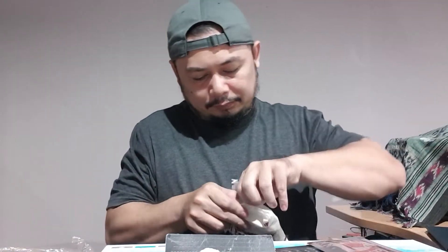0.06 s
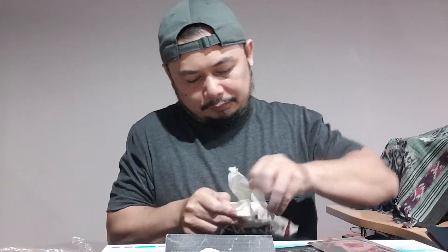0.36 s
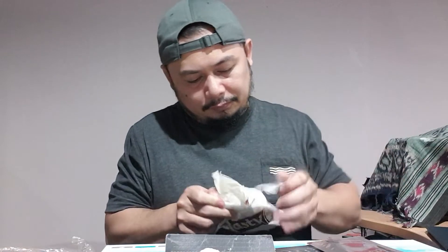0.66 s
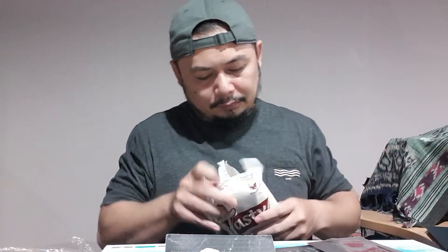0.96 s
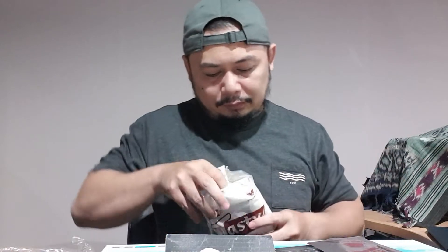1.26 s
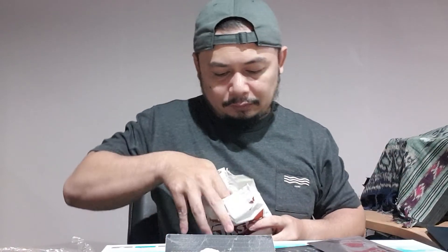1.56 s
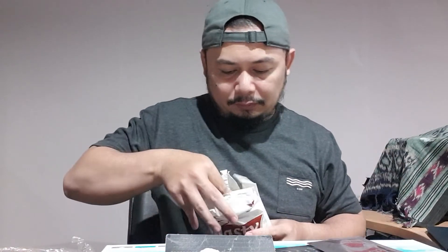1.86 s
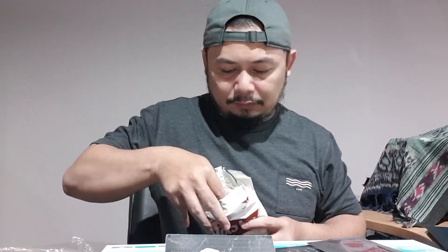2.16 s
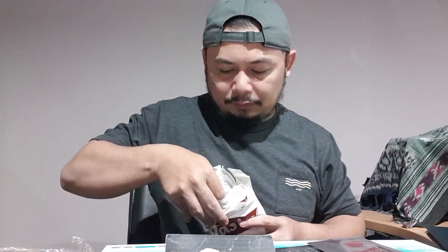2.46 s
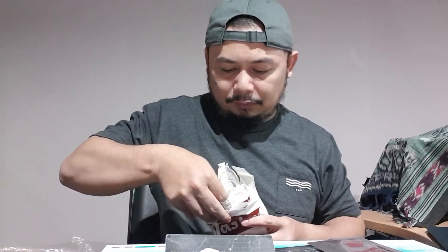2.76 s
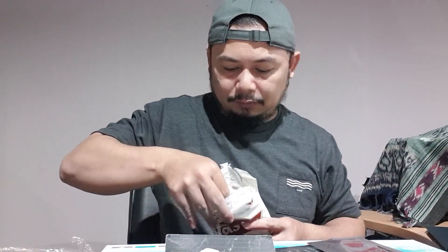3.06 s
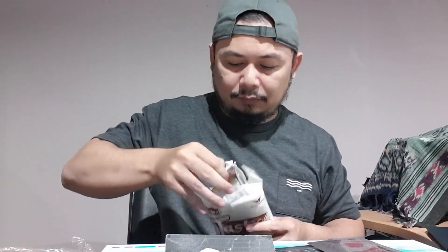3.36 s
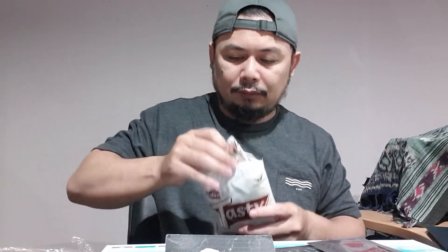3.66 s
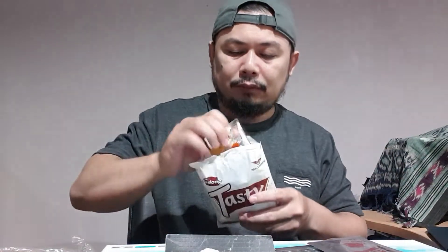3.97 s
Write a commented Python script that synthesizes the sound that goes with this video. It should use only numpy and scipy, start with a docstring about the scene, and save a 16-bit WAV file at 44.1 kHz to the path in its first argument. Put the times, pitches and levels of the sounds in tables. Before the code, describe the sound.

Hands knead a plastic noodle packet, making it crackle, snap and rustle.

```python
"""A fine crackle and rustle of plastic: two hands squeeze and knead a noodle packet at a table.
Creases in the film buckle in sharp snaps over the swarm of tiny crackles, the dry noodles crunch dully
inside, and now and then a whole wall of the packet flips with a hollow pop. The film sounds in three
bands: low body, middle crack and high sizzle. The small room adds a short tail, a rumble and a low hum."""
import sys
import numpy as np
from scipy import signal
from scipy.fft import rfft, irfft
from scipy.io import wavfile
from scipy.ndimage import uniform_filter1d

SR = 44100
rng = np.random.default_rng(int(sys.argv[2]) if len(sys.argv) > 2 else 0)


def generate_wav(signal):
    """Clip the signal to [-1, 1] and save it as 16-bit WAV at the path in sys.argv[1]."""
    frames = np.transpose(np.atleast_2d(signal))
    scaled = np.clip(frames, -1, 1) * 32767
    pcm = np.round(scaled).astype(np.int16)
    wavfile.write(sys.argv[1], SR, pcm)


N = 176400

# Tone colour of the packet: frequency_hz, gain_db
PACKET_EQ = [(60, -2), (170, -10), (280, -2), (380, -2.5), (495, 5), (620, -2.5), (740, 1), (1020, -2.5),
             (1600, 2), (2300, 2.5), (3100, 4), (4300, 3), (5200, -1.5), (6500, -8.5), (8600, -21),
             (10800, -9), (12500, -10), (15000, -9.5), (17000, -14.5)]
# Stereo image: frequency_hz, correlation, left_minus_right_db
STEREO_IMAGE = [(200, 0.96, -1.5), (600, 0.87, -2.5), (1200, 0.65, -5), (2200, 0.039, 0), (4000, 0.2, -2.5),
                (6000, 0, -1.5), (9000, 0, 2.5), (15100, 0, 5)]
# Fader ride for crackle and rustle as the fingers press and let go: time_s, body_db, crack_db, sizzle_db
FINGER_PRESSURE = [(0.0, -45, -40, -42.5), (0.192, -43.5, -34.5, -53), (0.216, -26, -23, -27),
                   (0.36, -42.5, -41, -51.5), (0.415, -33, -29, -36.5), (0.454, -38.5, -42.5, -52),
                   (0.506, -34.5, -26.5, -26), (0.544, -41, -37, -47), (0.564, -37, -29.5, -37),
                   (0.675, -45, -46, -53.5), (0.743, -32, -30.5, -36), (0.802, -49, -46, -55),
                   (0.848, -39.5, -41.5, -51), (0.893, -51, -44, -61), (0.978, -33.5, -32, -39.5),
                   (1.043, -40, -37.5, -43), (1.072, -32.5, -28, -38), (1.126, -44, -41.5, -50),
                   (1.314, -35.5, -33.5, -42), (1.337, -46, -41.5, -49), (1.367, -35, -37.5, -48),
                   (1.467, -43, -39, -44.5), (1.566, -32, -32.5, -40.5), (1.721, -54, -44, -54),
                   (1.739, -33, -33.5, -36), (1.776, -38.5, -36.5, -50), (1.797, -31.5, -31.5, -35),
                   (1.831, -39, -31.5, -40.5), (1.966, -56, -52.5, -58), (1.99, -39.5, -43.5, -65),
                   (2.02, -48, -45.5, -56), (2.096, -34.5, -34, -44), (2.21, -45.5, -42.5, -52),
                   (2.26, -53, -49.5, -62), (2.365, -50.5, -51, -62), (2.395, -51, -42.5, -64),
                   (2.44, -50, -50, -62), (2.519, -55, -60, -73), (2.534, -54, -46, -68),
                   (2.624, -47.5, -53.5, -69), (2.644, -61, -51.5, -57), (2.719, -51, -48.5, -55.5),
                   (2.809, -56, -60, -77), (2.854, -61, -61, -82), (2.868, -44.5, -41, -69),
                   (2.908, -42, -40.5, -47.5), (2.978, -46.5, -50, -68), (2.998, -46, -38, -49),
                   (3.023, -61, -52, -62), (3.042, -38, -37, -38.5), (3.148, -44, -36.5, -50),
                   (3.183, -31, -31, -33.5), (3.243, -41, -36.5, -41), (3.283, -35, -30, -37),
                   (3.392, -38.5, -31, -36.5), (3.467, -36.5, -40, -42), (3.482, -40, -34.5, -38),
                   (3.587, -47, -49, -56), (3.642, -45, -41, -50), (3.801, -39, -37, -43),
                   (3.816, -39.5, -38, -49), (3.931, -45, -43.5, -48), (3.951, -38, -34, -45),
                   (3.996, -43.5, -41, -54)]
# Reverb of the small room: frequency_hz, t60_s, level_db
ROOM_TAIL = [(200, 0.4, -15), (595, 0.87, -13), (2000, 0.13, -4.5), (5000, 0.15, -7), (8440, 0.15, 0.5),
             (14800, 0.14, -26)]
# Spectrum of the steady rumble and hiss: frequency_hz, relative_db
RUMBLE_EQ = [(15, -38), (30, -24), (45, -6.5), (70, -0.5), (120, -4), (150, -1.5), (210, -6.5),
             (300, -11.5), (500, -20), (1000, -37), (3000, -30), (8000, -49.5), (16000, -57.5)]
# Fader ride that the low hum wavers around: time_s, level_db
HUM_RIDE = [(0, -43), (.25, -40), (.38, -53), (.55, -40), (.8, -51), (.91, -35), (1.2, -48), (1.62, -40),
            (1.85, -34), (2.0, -47), (2.21, -36), (2.5, -51), (2.7, -44), (2.9, -48), (3.12, -38.5),
            (3.8, -41), (4, -51)]
# Cues for the large creases, ahead of the band trims: start_s, ring_hz, body_db, crack_db, sizzle_db
CREASE_SNAPS = [(0.028, 2300, -32, -31.5, -37), (0.0814, 1050, -27, -36, -40), (0.112, 2300, -57, -26, -40),
                (0.1228, 2840, -28.5, -26, -35), (0.1418, 3060, -32, -25, -28.5),
                (0.1659, 1630, -20, -19, -29), (0.202, 4530, -36, -12.5, -13.5),
                (0.209, 4000, -40, -22, -23), (0.2203, 3100, -26, -30, -22), (0.2285, 4340, -23, -20, -32),
                (0.3779, 4200, -55, -47, -38), (0.3915, 1900, -53, -26.5, -31.5),
                (0.4701, 4100, -19.5, -18.5, -30.5), (0.4836, 1840, -39, -19.5, -41),
                (0.501, 3080, -32, -20.5, -31), (0.5219, 1680, -60, -23.5, -28),
                (0.5314, 1700, -29, -28, -41), (0.5595, 4000, -26, -26.5, -27.5),
                (0.595, 3800, -28.5, -26, -29), (0.6341, 2960, -29, -24, -29.5),
                (0.8373, 4300, -64, -31.5, -37.5), (0.8677, 4020, -66, -30, -48),
                (0.9562, 2850, -29.5, -26, -35.5), (0.9724, 1770, -28, -27, -40),
                (0.998, 3280, -43, -42, -38), (1.014, 4000, -37, -37, -35), (1.0208, 1100, -27.5, -43, -35),
                (1.048, 2960, -50, -32, -37), (1.0768, 1200, -32.5, -25, -31.5),
                (1.1747, 2480, -28.5, -39, -41.5), (1.2446, 1560, -29.5, -26, -38.5),
                (1.2716, 1100, -27.5, -45, -53), (1.3111, 4530, -79, -27.5, -37),
                (1.3527, 4000, -35, -26.5, -36), (1.36, 4000, -25.5, -33, -47),
                (1.4007, 4000, -52, -42, -42), (1.4099, 3970, -30, -30.5, -34),
                (1.4732, 1740, -24, -29.5, -45), (1.5259, 1820, -27, -25, -36),
                (1.544, 3970, -42, -31, -32), (1.5572, 4000, -35, -23.5, -32),
                (1.5655, 1720, -30, -27, -31.5), (1.5875, 1820, -25, -25, -35),
                (1.6221, 3000, -25.5, -26.5, -35.5), (1.682, 2840, -50, -38, -37.5),
                (1.7311, 2900, -31, -29, -46), (1.7646, 3500, -51, -38, -40), (1.784, 3120, -52, -25, -33),
                (1.8499, 5420, -56, -27.5, -37), (2.2068, 2470, -24.5, -29.5, -44),
                (2.304, 4000, -59, -34, -55), (2.386, 1200, -55, -36, -69), (2.411, 2570, -60, -42, -69),
                (2.526, 2650, -41.5, -35, -64), (2.6366, 4000, -39.5, -40, -37.5),
                (2.6832, 2530, -56, -33, -52), (2.7392, 4800, -61, -41, -60), (2.8164, 1660, -40, -36, -74),
                (2.8659, 2540, -31, -33, -53), (2.9314, 1060, -34.5, -33.5, -58),
                (2.9857, 4270, -56, -37, -47), (3.0439, 2840, -30, -27, -35.5),
                (3.0672, 1850, -28, -30.5, -42), (3.1567, 4000, -43, -25, -36),
                (3.184, 3200, -35, -27.5, -34), (3.332, 3280, -30, -26, -45), (3.4222, 3040, -46, -17, -27),
                (3.471, 1480, -32, -20.5, -28), (3.4799, 2200, -42, -15, -23.5),
                (3.483, 2000, -32, -25, -34), (3.5022, 3260, -30.5, -30, -33),
                (3.532, 2370, -31, -27.5, -30), (3.6178, 4500, -41, -31, -32.5),
                (3.634, 3190, -35.5, -20, -41), (3.6928, 4230, -34.5, -28, -35.5),
                (3.7407, 3040, -33.5, -29.5, -32), (3.761, 3870, -36, -23.5, -30.5),
                (3.7654, 3050, -25.5, -28, -34), (3.914, 1320, -49, -26, -42),
                (3.9503, 2820, -31, -27, -34.5), (3.9753, 1450, -46, -29, -35)]
# Cues for the hollow pops: start_s, pitch_hz, level_db
WALL_POPS = [(.390, 454, -22), (.419, 505, -30), (0.469, 473, -21), (0.504, 520, -19), (0.531, 487, -23.5),
             (.752, 440, -24), (1.074, 488, -21.5), (1.270, 544, -26.5), (1.555, 497, -26),
             (1.587, 514, -20), (1.621, 340, -27), (2.865, 360, -32.5), (3.175, 456, -24)]

# Each triple is body, crack, sizzle.
GRAIN_TRIM_DB, SNAP_TRIM_DB, RUSTLE_TRIM_DB = [-3, -2.5, -1], [-2.5, -2.5, 1], [-3.5, -5, -5]
GRAIN_DECAY_S, SNAP_DECAY_S = [0.0024, 0.00053, 0.00031], [0.0026, 0.0015, 0.001]
GRAIN_SHIVER_DB, SNAP_SHIVER_DB = [-5.5, -12, -13], [-16, -2.5, -12]
GRAIN_SPREAD_DB = [5, 0.5, 6.5]

TABLE_ECHOES_S = [0.0039, 0.0057, .0087]
TAPS = 2048  # samples in a band response, and in one buckle


def amp(db):
    """Decibels to gain."""
    return 10 ** (np.asarray(db) / 20)


def unit(x):
    """Scale to an rms of one."""
    return x / np.sqrt(np.mean(x ** 2) + 1e-20)


def curve_at(points, hz, column=1):
    """One column of a table, interpolated along log frequency."""
    table = np.array(points, float)
    return np.interp(np.log(hz + 1), np.log(table[:, 0] + 1), table[:, column])


def add(mix, start_s, sound):
    """Drop a stereo sound into the mix."""
    part = mix[:, max(round(start_s * SR), 0):][:, :sound.shape[1]]
    part += sound[:, :part.shape[1]]


def drift(samples):
    """Smooth random movement with an rms of one."""
    return unit(uniform_filter1d(uniform_filter1d(rng.standard_normal(N), samples), samples))


def minimum_phase(gain):
    """The spectrum with this gain and the tightest attack."""
    log_gain = np.log(np.maximum(gain, 1e-5))
    mirrored = np.r_[log_gain, log_gain[-2:0:-1]]
    return np.exp(np.conj(signal.hilbert(mirrored)))[:len(gain)]


def stereo(spectra, hz):
    """Blend two spectra into left and right: narrow lows, wide highs."""
    same = np.clip(curve_at(STEREO_IMAGE, hz), -1, 1)
    return np.array([spectra[0], same * spectra[0] + np.sqrt(1 - same ** 2) * spectra[1]])


def packet_bands(body_top_hz=1000, crack_top_hz=7000):
    """The packet's colour split into stereo responses for body, crack and sizzle."""
    hz = np.fft.rfftfreq(TAPS, 1 / SR)
    low = 1 / (1 + (hz / body_top_hz) ** 8)
    mid = 1 / (1 + (hz / crack_top_hz) ** 14)
    colour_db = curve_at(PACKET_EQ, hz)
    pan_db = curve_at(STEREO_IMAGE, hz, column=2) / 2
    return [np.array([minimum_phase(np.sqrt(share) * amp(colour_db + side * pan_db)) for side in (1, -1)])
            for share in (low, mid - low * mid, 1 - mid)]


def finger_pressure():
    """Gains of body, crack and sizzle under the moving fingers."""
    times, *bands_db = np.transpose(FINGER_PRESSURE)
    return amp([np.interp(np.arange(N) / SR, times, db) for db in bands_db])


def buckle(bands, ring_hz, decays_s, shiver_db, ring_db, tick_db=-7, shiver_s=0.0048, ring_s=.0012):
    """One crease flips: a clean tick, a burst, a ringing facet and a shiver, in bands of unit energy."""
    t, hz = np.arange(TAPS) / SR, np.fft.rfftfreq(TAPS, 1 / SR)
    parts = []
    for k, (band, decay) in enumerate(zip(bands, decays_s)):
        burst = (1 + t / decay) * np.exp(-2 * t / decay)
        shiver = amp(shiver_db[k]) * np.exp(-t / shiver_s)
        noise = rng.standard_normal((2, TAPS)) * (burst + shiver)
        part = unit(irfft(stereo(rfft(noise), hz) * band))
        part = unit(part + amp(tick_db) * unit(irfft(band)))
        if k == 1:  # the facet rings in the crack band only
            ring = np.sin(2 * np.pi * ring_hz * t + rng.normal(0, 0.29, (2, 1))) * np.exp(-t / ring_s)
            part = unit(part + amp(ring_db) * unit(irfft(rfft(ring) * band)))
        parts.append(part / np.sqrt(TAPS))
    return np.array(parts)


def crackle(bands, grains_per_s=420, facets=120, facet_range_hz=(1350, 4800), clump_s=.006):
    """Tiny creases and noodle crumbs break in clumps, mostly small, each on one of many ringing facets."""
    clump_db = 3 * drift(int(clump_s * SR))
    size_db = np.outer(GRAIN_SPREAD_DB, np.minimum(rng.exponential(1, N), 4))
    breaks = rng.random(N) < grains_per_s / SR
    colour_db = 2 * rng.standard_normal((3, N))
    gains = breaks * amp(size_db + clump_db + colour_db)
    # Even out the swarm so that the fingers ride its level.
    power = uniform_filter1d(uniform_filter1d(gains ** 2, size=1200), size=700)
    gains = gains * finger_pressure() * amp(GRAIN_TRIM_DB)[:, None] / np.sqrt(abs(power) + 1e-9)
    facet = rng.integers(0, facets, N)
    grains = [buckle(bands, hz, GRAIN_DECAY_S, GRAIN_SHIVER_DB, ring_db=2)
              for hz in np.geomspace(*facet_range_hz, facets)]
    out = np.zeros((2, N))
    for i in np.flatnonzero(breaks):
        add(out, i / SR, np.tensordot(gains[:, i], grains[facet[i]], 1))
    return out


def rustle(bands, slips_per_s=2500, slip_s=0.00039, spread_db=3.5):
    """Film slides on skin and on itself in thousands of minute slips."""
    slips = (rng.random(N) < slips_per_s / SR) * amp(spread_db * rng.standard_normal(N))
    power = signal.lfilter([1], [1, -np.exp(-2 / (slip_s * SR))], slips ** 2)
    envelope = np.sqrt(power / (uniform_filter1d(power, size=900) + 1e-9))
    rub = envelope * rng.standard_normal((2, N))
    rub = irfft(stereo(rfft(rub), np.fft.rfftfreq(N, 1 / SR)), N)
    return sum(amp(db) * pressure * unit(signal.oaconvolve(rub, irfft(band), axes=1)[:, :N])
               for db, pressure, band in zip(RUSTLE_TRIM_DB, finger_pressure(), bands))


def room_tone(rumble_db=-40.5, hum_hz=91.9, waver_hz=3.05, waver_db=2.5):
    """A bed of low rumble and faint hiss, with a hum that wavers in pitch and level."""
    hz, t = np.fft.rfftfreq(N, 1 / SR), np.arange(N) / SR
    noise = stereo(rfft(rng.standard_normal((2, N))), hz)
    rumble = amp(rumble_db) * unit(irfft(noise * amp(curve_at(RUMBLE_EQ, hz)), N))
    cycles = np.cumsum(hum_hz + waver_hz * drift(samples=2000)) / SR
    hum_db = np.interp(t, *np.transpose(HUM_RIDE)) + waver_db * drift(samples=2500)
    hum = amp(hum_db) * np.sqrt(2) * np.sin(2 * np.pi * cycles)
    return (rumble + hum) * amp([[-.6], [.6]])  # leans a little to the right


def room_reverb(sound, fade_in_s=0.0038, echo_db=-22.5):
    """Wet signal only: quick echoes off the table, then a short diffuse tail."""
    n = SR // 2
    hz, t, noise = signal.stft(rng.standard_normal((2, n)), SR, nperseg=256)
    t60 = curve_at(ROOM_TAIL, hz)[:, None]
    fade = amp(curve_at(ROOM_TAIL, hz, column=2)[:, None] - 60 * t / t60)
    fade *= np.sqrt(2 * np.log(1000) / (t60 * SR))  # a longer decay adds no energy
    tail = signal.istft(stereo(noise, hz[:, None]) * fade, SR, nperseg=256)[1][:, :n]
    tail *= np.minimum(np.arange(n) / SR / fade_in_s, 1)
    for echo_s in TABLE_ECHOES_S:
        arrivals = np.round((echo_s + rng.uniform(0, .0002, 2)) * SR).astype(int)
        tail[[0, 1], arrivals] += amp(echo_db)
    return signal.fftconvolve(sound, tail, axes=1)[:, :N]


def crease_snaps(bands, usual_db=-34, doubling_db=46, rms_window_s=.005):
    """Large creases give way one by one: the bigger, the longer; the lighter, the clearer the ring."""
    out = np.zeros((2, N))
    for start_s, ring_hz, *levels_db in CREASE_SNAPS:
        gains = amp(np.add(levels_db, SNAP_TRIM_DB)) * np.sqrt(rms_window_s * SR)
        excess_db = levels_db[1] - usual_db
        decays_s = np.array(SNAP_DECAY_S) * 2 ** (excess_db / doubling_db)
        ring_db = -1 + .5 * max(-excess_db, 0)
        snap = buckle(bands, ring_hz, decays_s, SNAP_SHIVER_DB, ring_db)
        add(out, start_s, np.tensordot(gains, snap, 1))
    return out


def wall_pops(decay_cycles=3.1, sag=0.029, overtone_ratio=1.594, overtone_db=-8.5):
    """A whole wall of the packet flips and rings briefly in two modes, sinking in pitch as it slackens."""
    t, out = np.arange(0, .08, 1 / SR), np.zeros((2, N))
    for start_s, pitch_hz, level_db in WALL_POPS:
        fade = np.exp(-t * pitch_hz / decay_cycles)
        phase = 2 * np.pi * np.cumsum(pitch_hz * (1 + sag * (fade - .5))) / SR
        modes = np.sin(phase) + amp(overtone_db) * np.sin(overtone_ratio * phase)
        pan = amp(curve_at(STEREO_IMAGE, pitch_hz, column=2) * np.array([[.5], [-.5]]))
        add(out, start_s, amp(level_db) * modes * fade * pan)
    return out


def scene():
    """The packet moves in the hands, so its echoes shift between two paths through the room."""
    bands = packet_bands()
    packet = crease_snaps(bands) + crackle(bands) + rustle(bands) + wall_pops()
    turn = 2 * np.pi * np.arange(N) / N
    reverb = room_reverb(packet * np.cos(turn)) + room_reverb(packet * np.sin(turn))
    return packet + reverb + room_tone()


def record(dry):
    """Hard-clip any peak over the ceiling, then cut the very top of the treble."""
    lowpass = signal.firwin(401, 15950, window=("kaiser", 8), fs=SR)
    return signal.oaconvolve(np.clip(dry, -.85, .85), lowpass[None], "same")


dry = scene()
out = record(dry)
generate_wav(out)
```